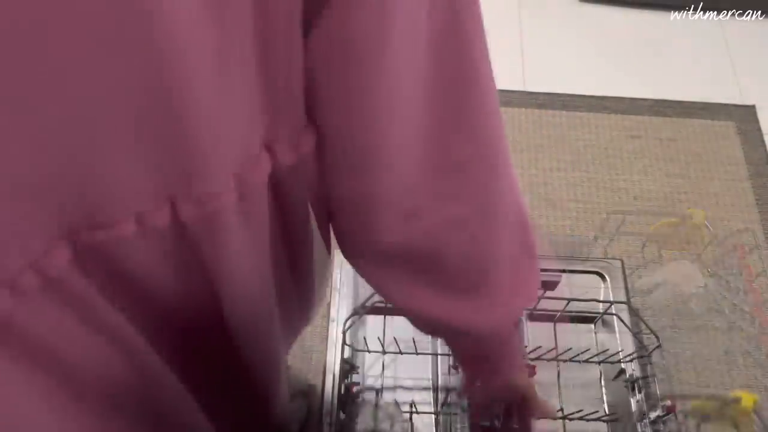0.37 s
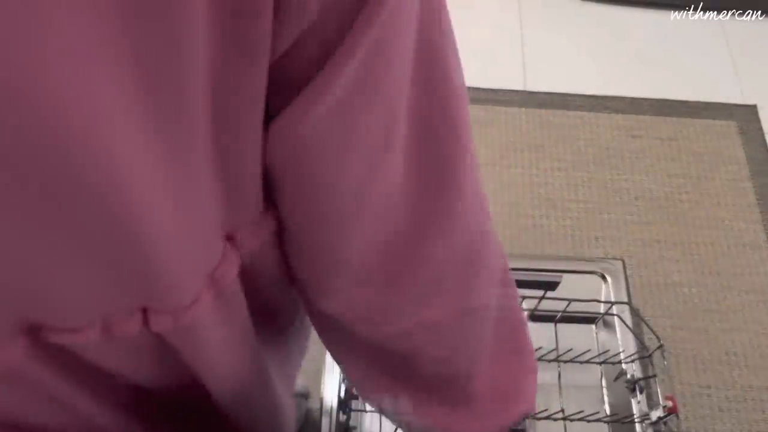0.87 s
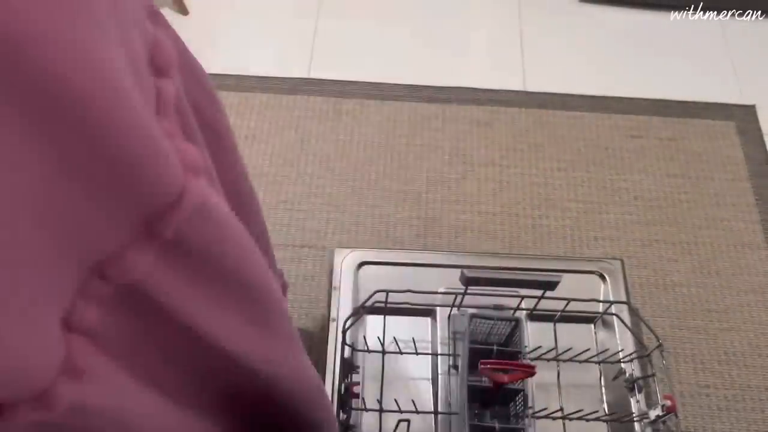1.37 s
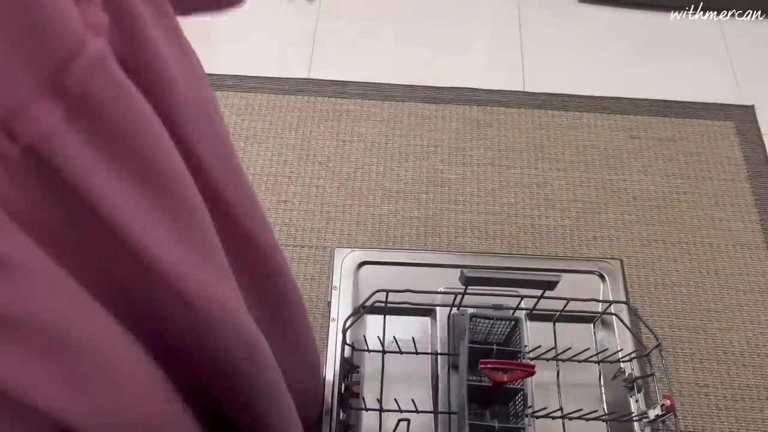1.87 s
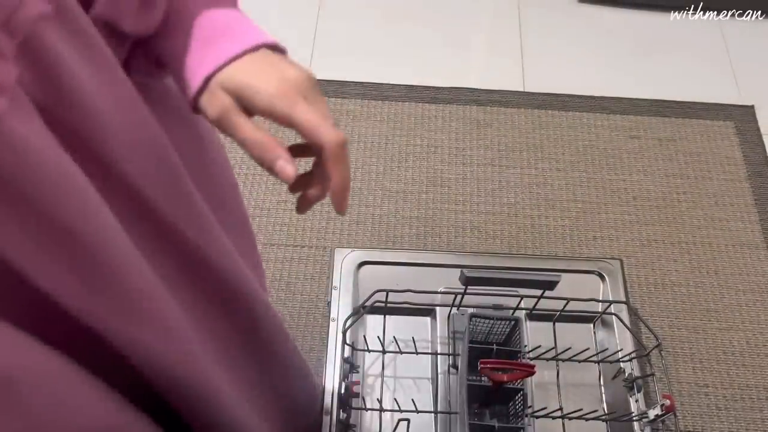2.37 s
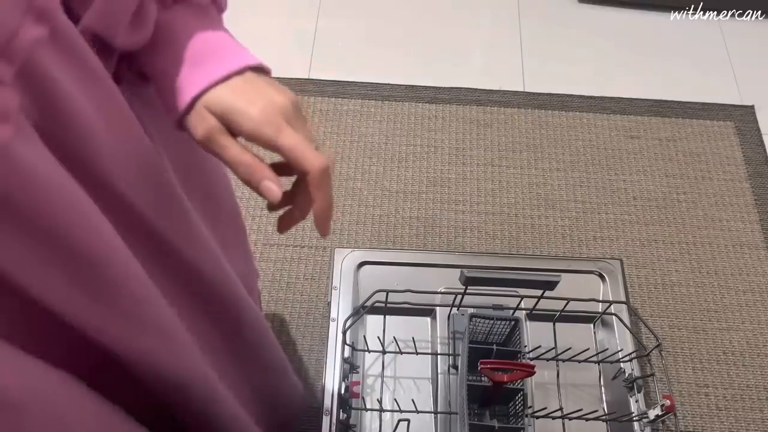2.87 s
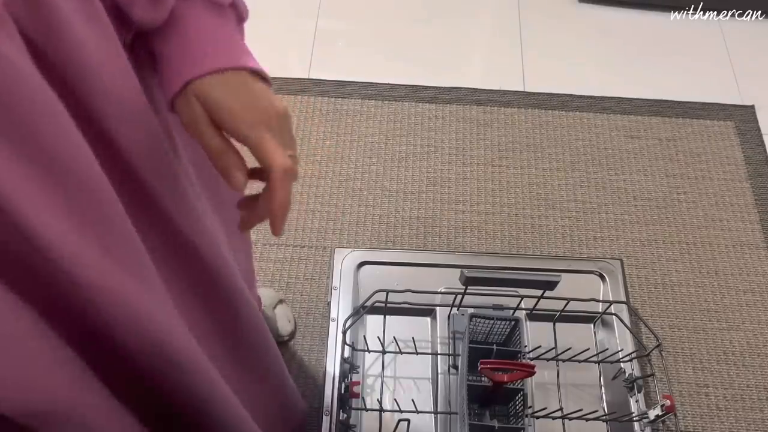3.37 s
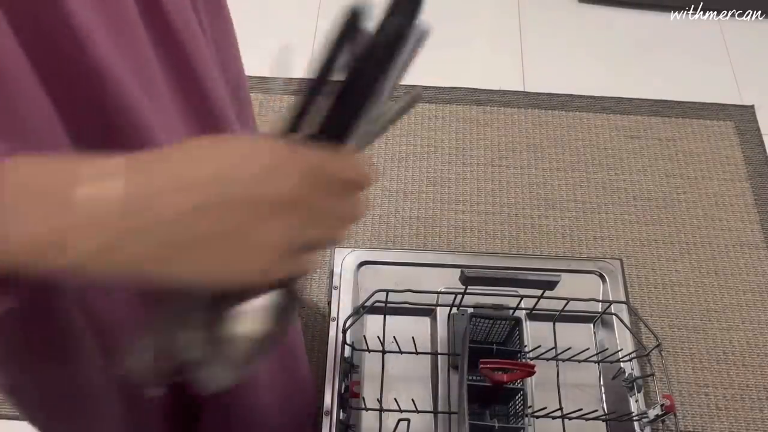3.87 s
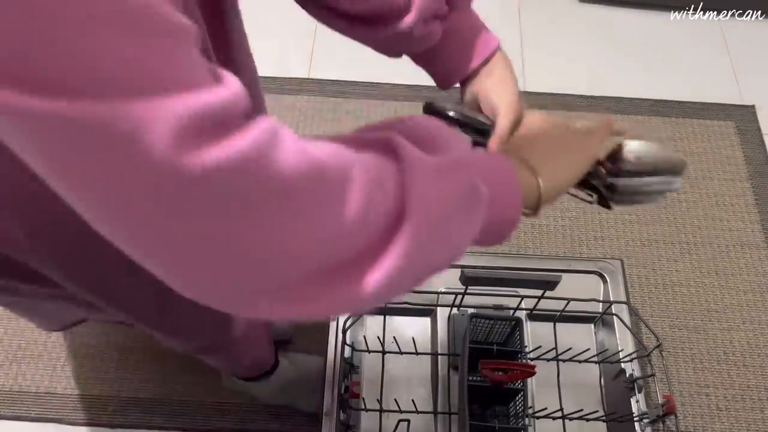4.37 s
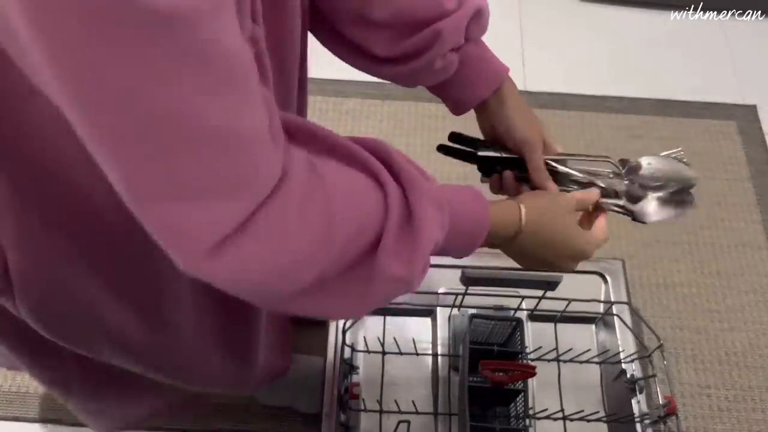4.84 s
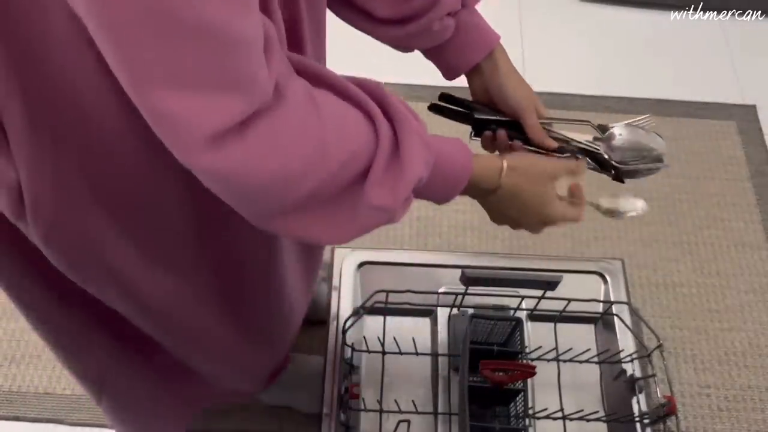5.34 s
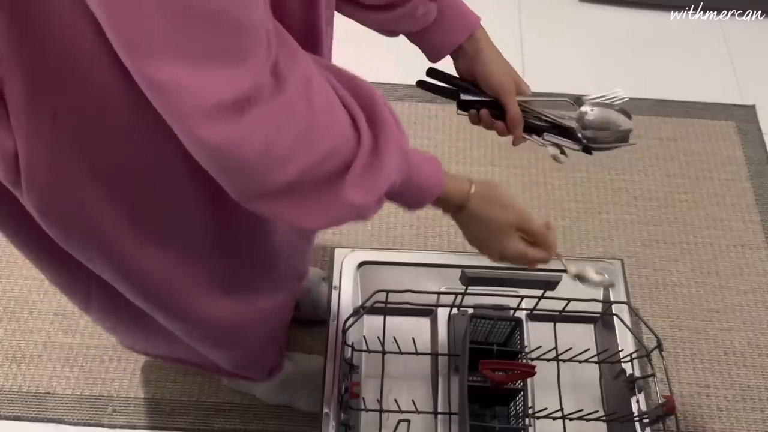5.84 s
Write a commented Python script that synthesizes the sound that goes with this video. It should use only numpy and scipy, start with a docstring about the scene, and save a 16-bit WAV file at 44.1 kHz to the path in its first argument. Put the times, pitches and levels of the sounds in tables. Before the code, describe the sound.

Close stereo pickup in a reverberant home kitchen with a quiet steady hum. First a rack rumbles and clatters with wavering squeaks, then near-quiet with soft footsteps. A dense, hard burst of forks and spoons scraping on ringing steel is the loudest moment. After a short lull, handled cutlery jingles brightly with dull grip rubs, tapering to small isolated ticks.

```python
"""A wire dishwasher rack rolls in with a squeal, and bumps shake its glasses, in a tiled kitchen.
Cutlery is raked together on a steel worktop to the left, then shuffled and sorted in the hands near the
microphones, the handles rubbing in the grip. Feet shuffle between, and an appliance hums low in the room.
Contacts are short bursts of coloured noise that set sines ringing; the squeal is two unsteady tones.
Feet and grip are noise alone, the hum is steady filtered noise, and the room adds dying echoes."""
import sys
import numpy as np
from scipy import signal
from scipy.fft import rfft, irfft, next_fast_len
from scipy.io import wavfile

SR = 44100
rng = np.random.default_rng(int(sys.argv[2]) if len(sys.argv) > 2 else 0)


def gain_from_decibels(decibels):
    """Convert decibel values to linear amplitude factors."""
    exponent = np.asarray(decibels, float) / 20
    return 10 ** exponent


def waveform_to_disk(signal):
    """Save audio, clipped to [-1, 1], as 16-bit WAV at the path in sys.argv[1]."""
    frames = np.transpose(np.atleast_2d(signal))
    scaled = np.clip(frames, -1, 1) * 32767
    samples = np.round(scaled).astype(np.int16)
    wavfile.write(sys.argv[1], SR, samples)


N = 263277  # length in samples

# Where rumble, body, middle and edge meet: three frequencies [Hz]
BAND_EDGES_HZ = (400, 2000, 7000)
# How each band of rack and feet noise follows a burst, one row each for rumble, body, middle, edge:
# (level above the top [dB], share of swell time [ratio], share of die-away [ratio], share of brightness [ratio])
RACK_BANDS = [(5.5, 1, 1.7, -.6), (2, 0.89, 1.63, -0.49), (0, 1.09, 1.31, -0.13), (-13, 0.51, 1.1, 1.3)]
# Tone colour of rack and feet: (frequency [Hz], relative level per hertz [dB])
RACK_COLOUR = [(24, -47), (40, -19.5), (86, 10), (135, -11), (412, -10), (597, -18), (845, -15.5),
               (1060, -17.5), (2060, -22.5), (2990, -16.5), (3650, -20), (8690, -34), (9840, -27.5),
               (13600, -38.5), (15000, -63.5)]
# Where rack and feet sit: (frequency [Hz], left minus right [dB])
RACK_SIDE = [(60, 1), (180, -2.5), (550, 1.5), (1650, 0.5), (4970, 7.5), (15000, -5.5)]
# Where the hands sit: (frequency [Hz], left minus right [dB])
HANDS_SIDE = [(60, -19), (180, 17.5), (550, -2), (1650, -0.5), (4970, 6), (15000, -4)]


def rms_one(x):
    """Scale to an average strength (rms) of one."""
    return x / np.sqrt(np.mean(x ** 2) + 1e-20)


def at_hz(points, hz):
    """Read a table at any frequency, in straight lines on a log-frequency axis."""
    table_hz, values = np.transpose(points)
    return np.interp(np.log(hz + 1), np.log(table_hz), values)


def colour(x, points, side):
    """Filter that never sounds ahead of its input (minimum phase), tipped left or right; two channels."""
    hz = np.fft.rfftfreq(4096, 1 / SR)
    db = at_hz(points, hz) + np.outer([.5, -.5], at_hz(side, hz))
    # folding the spectrum's logarithm onto positive times puts all the response after the input
    log_echoes = irfft(db * np.log(10) / 20)
    fold = np.r_[1, np.full(2047, 2), 1, np.zeros(2047)]
    kernel = irfft(np.exp(rfft(log_echoes * fold)))
    return signal.oaconvolve(np.broadcast_to(x, (2, N)), kernel, axes=1)[:, :N]


def bands(x):
    """Split sound by frequency into rumble, body, middle and edge."""
    low, middle, high = BAND_EDGES_HZ
    cuts = [(low, "low"), ([low, middle], "band"), ([middle, high], "band"), (high, "high")]
    return [signal.sosfilt(signal.butter(3, hz, kind, fs=SR, output="sos"), x) for hz, kind in cuts]


def band_of(hz):
    """Which of rumble, body, middle and edge holds this pitch."""
    return np.searchsorted(BAND_EDGES_HZ, hz)


def fading(x, time_s):
    """Turn each click into a jump that dies away exponentially."""
    return signal.lfilter([1], [1, -np.exp(-1 / (time_s * SR))], x)


def ring(clicks, hz, t60):
    """A resonance: a unit click sets a sine of height 1 ringing, which falls 60 dB in t60 seconds."""
    shrink = gain_from_decibels(-60 / (t60 * SR))
    turn = 2 * np.pi * hz / SR
    return signal.lfilter([0, np.sin(turn)], [1, -2 * shrink * np.cos(turn), shrink ** 2], clicks + 1e-18)


def bursts(start_s, swell_s, db, t60):
    """Loudness curve: each burst swells in a straight ramp, then dies away; their powers add."""
    power = np.zeros(N)
    for start, swell, top_db, die in np.broadcast(start_s, swell_s, db, t60):
        i = int(start * SR)
        t = np.arange(min(N - i, int((swell + 1.5 * die) * SR))) / SR
        ramp = np.minimum(t / swell, 1)
        decay = gain_from_decibels(top_db - 60 * np.maximum(t - swell, 0) / die)
        power[i:i + len(t)] += (ramp * decay) ** 2
    return np.sqrt(power)


def clatter(rows, follow, spectrum, side, modes, per_s, uneven_db, smear_s, ring_db, damped, apart):
    """Dense uneven contacts, each a short scrape, swell with the handling; each also strikes one mode, if any."""
    start_s, swell_s, top_db, t60, bright_db = np.transpose(rows)
    gains = [bursts(start_s, swell_s * late, top_db + db + share * bright_db, t60 * linger)
             for db, late, linger, share in follow]
    heights = gain_from_decibels(uneven_db * np.minimum(rng.exponential(1, N), 4))
    touches = (rng.random(N) < per_s / SR) * heights
    scrapes = fading(touches, smear_s)
    # several pieces at several places: the two ears share only part of the noise, most of it in the treble
    unshared = signal.sosfilt(signal.butter(2, 7000, fs=SR, output="sos"), rng.standard_normal(N))
    noise = rng.standard_normal(N) + apart * unshared * [[1], [-1]]
    parts = bands(colour(scrapes * noise, spectrum, side))
    out = sum(gain * rms_one(part) for gain, part in zip(gains, parts))
    dealt = rng.integers(0, max(len(modes), 1), N)  # which mode each touch strikes
    for k, (hz, db, mode_t60) in enumerate(modes):
        tip = gain_from_decibels(at_hz(side, hz) * np.array([[.5], [-.5]]))
        strikes = touches * (dealt == k) * gains[band_of(hz)]
        out += tip * gain_from_decibels(db + ring_db) * ring(strikes, hz, mode_t60 * damped)
    return out


def blows(rows, spectrum, side, modes, crack_s, crack_db, tick_db, knock_db, spread_db, focus_db,
          free_db, firm_edge_db, hardening):
    """A blow is a hard tick, a crack of dying noise and a knock; it rings mostly the modes near its pitch."""
    start_s, peak_db, body_db, ring_db, pitch_hz = np.transpose(rows)
    edge_db = firm_edge_db + hardening * (peak_db + 30)   # harder blows are brighter
    at = np.round(start_s * SR).astype(int)
    noise = rng.standard_normal(N)
    noise[at] = gain_from_decibels(tick_db)
    rumble, body, middle, edge = bands(colour(noise, spectrum, side))
    out = np.zeros((2, N))
    for band, db in zip((rumble + body, middle, edge), (body_db, 0, edge_db)):
        clicks = np.zeros(N)
        clicks[at] = gain_from_decibels(peak_db + db + crack_db)
        out += rms_one(band) * fading(clicks + 1e-18, crack_s)
    # the knock itself: one dull pulse that follows the body of the blow
    knocks = np.zeros(N)
    knocks[at] = gain_from_decibels(peak_db + body_db + knock_db)
    out += signal.sosfilt(signal.butter(2, [120, 1800], "band", fs=SR, output="sos"), knocks + 1e-18)
    mode_hz, mode_db, mode_t60 = np.transpose(modes)
    chance = rng.standard_normal((len(at), len(modes)))
    t = np.arange(int(.3 * SR))[:, None] / SR
    for i, level_db, loose_db, pitch, luck in zip(at, peak_db, ring_db, pitch_hz, chance):
        octaves_off = np.log2(mode_hz / pitch)
        # no two pieces are the same size: the nearest mode lands on the pitch, the others move along
        octaves_off -= octaves_off[np.argmin(np.abs(octaves_off))]
        hz = np.minimum(pitch * 2 ** octaves_off, SR / 2)
        own_db = (mode_db + spread_db * luck) * (octaves_off != 0)
        db = level_db + loose_db + own_db - focus_db * np.sqrt(np.abs(octaves_off))
        # a loosely held piece rings louder and, up to a limit, longer; a gripped one is damped
        t60 = mode_t60 * np.minimum(gain_from_decibels(loose_db - free_db), 1)
        rings = np.sin(2 * np.pi * hz * t) * gain_from_decibels(db - 60 * t / t60)
        tip = gain_from_decibels(np.outer(at_hz(side, hz), [.5, -.5]))
        out[:, i:i + len(t)] += (rings @ tip).T[:, :N - i]
    return out


def rolling_rack():
    """Jolts rattle the rack in many small contacts, and bumps along the rail set its glasses ringing."""
    # Bursts of rattling; swell and die-away are scaled for each band:
    # (start [s], swell [s], top level [dB], die-away t60 [s], brightness [dB])
    jolts = [(0.0, 0.001, -49.5, 0.26, -4), (.09, 0.014, -57.5, 0.95, -0.5), (.16, 0.11, -49.5, 1, -1),
             (.37, 0.024, -30, 0.27, 5), (.525, 0.029, -28.5, 0.25, 6), (.69, 0.045, -42.5, 0.55, -2),
             (.735, 0.044, -35, 0.45, -1.5), (.78, 0.042, -27, 0.11, 10), (.85, 0.046, -34, 0.34, 6.5)]
    # Bumps along the rail, and last a knock as the feet shuffle: (time [s], peak level [dB], body above peak
    # [dB], # ringing above peak [dB])
    bumps = [(.2194, -47, -3, 4), (.3714, -27.5, -9.5, -9), (.4668, -40, -26.5, -26),
             (.5308, -22, 9, -26.5), (.5994, -27, -7, -6), (.7509, -35, -16, -12),
             (.7674, -21.5, -5.5, -4.5), (.8294, -23.5, 5, -18.5), (.8994, -27, 2, -9.5),
             (1.6077, -41, -8, -37)]
    # What rings in the rack with its glasses: (pitch [Hz], relative level [dB], longest t60 [s])
    glasses = [(100.6, -2, 0.44), (305, -6, 0.075), (477.4, -3, 0.062), (854, -9, 0.15), (4260, -16, .1),
               (5100, -7, 0.033), (6930, -20, .07), (9560, -5, 0.16), (9670, -13, 0.11),
               (10200, -11.5, .12), (10880, -15.5, 0.052), (12350, -12, .08)]
    rattle = clatter(jolts, RACK_BANDS, RACK_COLOUR, RACK_SIDE, glasses, per_s=1500, uneven_db=5,
                     smear_s=0.0076, ring_db=-10, damped=0.58, apart=0.94)
    pitched_bumps = [(*row, 842) for row in bumps]  # every bump rings most at 842 Hz
    knocks = blows(pitched_bumps, RACK_COLOUR, RACK_SIDE, glasses, crack_s=.01, crack_db=-20, tick_db=0,
                   knock_db=12, spread_db=3, focus_db=2, free_db=-11, firm_edge_db=-15.5, hardening=.3)
    return rattle + knocks


def wheel_squeal():
    """A wheel sticks and slips on its rail: two unsteady tones, the lower sagging as the rack slows."""
    # Squeals after each push; the upper tone dies away sooner:
    # (start [s], swell [s], lower tone level [dB], upper tone level [dB], lower tone's die-away t60 [s])
    squeaks = [(.38, 0.043, -37.5, -49.5, 0.26), (0.516, 0.028, -31, -46.5, 0.49),
               (.62, .026, -49, -72, 0.46), (.69, 0.15, -34.5, -44.5, 0.45), (.91, 0.014, -43, -39, 0.31),
               (.98, .03, -51.5, -58.5, 0.68)]
    start_s, swell_s, low_db, high_db, t60 = np.transpose(squeaks)
    rough_db, waver_hz = 4, 24   # unsteadiness of loudness and of pitch
    stops_s, stopping_s = 1.105, .025
    t = np.arange(N) / SR
    pitch_hz = np.array([3020 - 115 * t, np.full(N, 6030)])   # about an octave apart
    gains = np.array([bursts(start_s, swell_s, low_db, t60), bursts(start_s, swell_s, high_db, t60 * .45)])
    flutter = signal.sosfilt(signal.butter(2, 70, fs=SR, output="sos"), rng.standard_normal((2, 2, N)))
    waver, rough = flutter / flutter.std()
    phase = 2 * np.pi * np.cumsum(pitch_hz + waver_hz * waver, axis=1) / SR
    tones = np.sum(gains * gain_from_decibels(rough_db * rough) * np.sin(phase), axis=0)
    tones *= np.clip((stops_s - t) / stopping_s, 0, 1)
    return np.sqrt(2) * tones * gain_from_decibels([[2], [-2]])   # louder on the left


def raking_on_worktop():
    """Cutlery raked on steel: dense scraping contacts and single hard blows make the worktop ring."""
    # Bursts of raking; swell and die-away are scaled for each band:
    # (start [s], swell [s], top level [dB], die-away t60 [s], brightness [dB])
    rakes = [(2.408, 0.035, -40, .3, -2.5), (2.448, 0.0041, -18.5, 0.68, 0.5),
             (2.538, 0.023, -18, 0.47, 2.5), (2.616, 0.012, -22.5, 1, 1), (2.635, 0.064, -13, 0.41, 1.5),
             (2.76, 0.028, -20.5, 0.098, 2.5), (2.92, 0.017, -42.5, .1, -2.5),
             (2.947, 0.0032, -31, 0.18, 12.5), (2.956, 0.015, -16, 0.16, 12.5),
             (3.144, 0.0017, -45.5, 0.1674, 8.5), (3.29, 0.042, -58, 0.5, 1), (3.352, 0.022, -55, 0.64, 1),
             (3.45, 0.0071, -55, 0.43, 5), (3.482, 0.0044, -46.5, 0.098, 20), (3.53, 0.039, -64, .45, -5),
             (3.66, 0.059, -65, 0.32, -4.5)]
    # Single blows: (time [s], peak level [dB], body above peak [dB], ringing above peak [dB],
    # pitch that rings most [Hz])
    hits = [(2.2856, -46.5, -22, -7.5, 3600), (2.4102, -40.5, -8, -5.5, 970), (2.4258, -22, -9, -21, 1640),
            (2.4538, -6.5, -11, -11, 3535), (2.5441, -9.5, -2, -14.5, 1270),
            (2.6196, -14, 10.5, -13.5, 990), (2.6773, -5.5, -13.5, -8.5, 1026),
            (2.9499, -10.5, -27, -38, 4440), (2.9611, -10.5, -39, -11, 2180),
            (3.1477, -22, -31, -18.5, 4444), (3.3156, -41.5, -7.5, -20.5, 3740),
            (3.3554, -30, -24, -20.5, 3740), (3.4194, -50, -11.5, -8, 3780), (3.455, -39, -7, -11, 4200),
            (3.485, -30.5, -19.5, -19, 3690), (3.6849, -46, -1.5, -16, 964)]
    # What rings in the worktop: (pitch [Hz], relative level [dB], longest t60 [s])
    worktop = [(830, 0.5, 0.037), (870, -17.5, 0.15), (1135, -4.5, 0.28), (1230, -17.5, 0.12),
               (1260, 4, 0.13), (1279, -3.5, 0.2), (2180, -9, 0.13), (2724, -19.5, 0.05),
               (3360, -0.5, 0.033), (3280, -7.5, 0.065), (3510, -3.5, 0.043), (3840, -6, 0.18),
               (4550, -0.5, .07), (4270, -3, 0.05), (4380, -7, 0.073), (5300, -14, .08),
               (5510, -11.5, 0.15), (9230, -13, 0.092), (8910, -1.5, .1), (10500, -0.5, 0.059),
               (11300, -25.5, .1)]
    # How rumble, body, middle and edge follow a burst: (level above the top [dB],
    # share of swell time [ratio], share of die-away [ratio], share of brightness [ratio])
    follow = [(-10, 0.92, 1.3, -2.4), (-2.5, 0.87, 0.88, -1.6), (1, 0.69, 0.78, -0.015),
              (-4, 0.68, 0.74, 0.53)]
    # Tone colour of the contacts: (frequency [Hz], relative level per hertz [dB])
    spectrum = [(30, -42.5), (72, -14), (104, 4), (146, -24), (390, -12.5), (650, -8.5), (900, 7.5),
                (1280, -1.5), (1550, -5), (2700, -11), (3350, -7), (3850, -11), (4450, -4.5), (5100, -11),
                (7700, -21.5), (11500, -14), (14300, -25), (15300, -55.5)]
    # Where the worktop sits: (frequency [Hz], left minus right [dB])
    side = [(60, -6), (180, 4.5), (550, 5.5), (1650, -1), (4970, 9.5), (15000, -4.5)]
    scraping = clatter(rakes, follow, spectrum, side, worktop, per_s=1000, uneven_db=2.5,
                       smear_s=0.0077, ring_db=-5.5, damped=0.53, apart=0.8)
    struck = blows(hits, spectrum, side, worktop, crack_s=0.018, crack_db=-19.5, tick_db=17, knock_db=4.5,
                   spread_db=1, focus_db=21, free_db=-11, firm_edge_db=-16, hardening=0.19)
    return scraping + struck


def sorting_in_hands():
    """Cutlery shuffled in the hands: many small contacts, with single clinks that ring at their own pitch."""
    # Bursts of shuffling; swell and die-away are scaled for each band:
    # (start [s], swell [s], top level [dB], die-away t60 [s], brightness [dB])
    shuffles = [(3.91, 0.027, -59.5, 1.13, -4.5), (4.003, 0.0049, -43, 0.24, 3),
                (4.103, .004, -56, 0.28, 3.5), (4.131, 0.005, -49, .3, 0.5), (4.17, 0.021, -40, 1.1, 2),
                (4.26, 0.019, -36.5, 0.95, 3.5), (4.334, 0.0054, -29.5, 0.5, 3.5),
                (4.395, 0.02, -34, 0.6, 2), (4.495, .004, -33, .3, 1.5), (4.506, .008, -32, 0.33, 3),
                (4.73, .024, -39.5, .3, -4), (4.812, .005, -49.5, 0.17, 3),
                (4.864, 0.0034, -44, 0.74, -1.5), (4.9, 0.0047, -34.5, 0.14, 4.5),
                (4.93, 0.01, -46, .4, 5.5), (5.163, .005, -52.5, 0.43, -2), (5.238, .006, -52.5, .3, -0.5),
                (5.282, 0.0051, -45, 0.53, -8), (5.34, 0.016, -64, .3, 0),
                (5.406, 0.0034, -56.5, 0.56, 1.5), (5.462, 0.0037, -56, .3, 6.5),
                (5.48, 0.027, -44.5, 0.5, -5.5), (5.576, 0.0064, -59, 0.59, 3.5),
                (5.657, 0.0013, -40.5, 0.12, -9.5), (5.665, 0.0202, -47, 0.29, -3.5)]
    # Single clinks: (time [s], peak level [dB], ringing above peak [dB], pitch that rings most [Hz])
    clinks = [(4.0106, -29.5, -6, 10240), (4.1053, -37, -13, 5250), (4.1334, -31.5, -11, 3540),
              (4.1734, -43, -6.5, 4290), (4.1819, -38.5, -4, 5140), (4.2704, -25.5, -8.5, 11160),
              (4.2837, -27.5, -18.5, 3930), (4.3009, -19.5, -9.5, 10500), (4.3385, -12, -8.5, 10900),
              (4.3514, -22, -2.5, 4940), (4.4144, -25.5, -1.5, 12750), (4.4974, -25.5, -12, 6660),
              (4.5116, -18, -11, 10840), (4.5342, -22.5, -9, 10690), (4.555, -34, 0, 5270),
              (4.7338, -37, -7.5, 4016), (4.7426, -34, -7.5, 3750), (4.807, -34.5, -3.5, 11900),
              (4.817, -31, -3, 13400), (4.8668, -31.5, -7.5, 2950), (4.9043, -24, -8, 10740),
              (4.9446, -22.5, 2.5, 11000), (4.952, -37, 0, 4910), (5.1682, -38, -6, 3230),
              (5.175, -52.5, 3.5, 2740), (5.24, -46.5, -10, 10560), (5.2855, -37, -8.5, 10800),
              (5.4087, -39, -11, 11300), (5.465, -34, -11.5, 11670), (5.5144, -36.5, -4.5, 4460),
              (5.5788, -34, -9.5, 10200), (5.659, -37, -7.5, 10100), (5.6834, -47.5, 4, 2536)]
    # What rings in the cutlery: (pitch [Hz], relative level [dB], longest t60 [s])
    cutlery = [(1113, 6, 0.062), (2020, -21, 0.064), (2640, -2, 0.07), (2810, -10.5, 0.073),
               (2880, 1.5, 0.077), (3220, -5, 0.11), (3348, -4, 0.13), (3737, 0.5, 0.14),
               (4100, 0.5, 0.057), (4710, -18, 0.074), (5020, -4.5, 0.17), (5400, -20.5, 0.097),
               (6000, -32.5, 0.023), (6730, 3, 0.075), (7240, 0.5, 0.052), (8400, -21.5, 0.05),
               (8720, -7, 0.089), (9840, -1.5, 0.13), (10700, -6, 0.049), (10944, 6.5, 0.14),
               (11000, -9.5, 0.122), (12300, -4, 0.14), (12300, -9, 0.112), (13700, -3, 0.11),
               (13400, -14, 0.075), (14820, -13, 0.13)]
    # How rumble, body, middle and edge follow a burst: (level above the top [dB],
    # share of swell time [ratio], share of die-away [ratio], share of brightness [ratio])
    follow = [(-29.5, 0.98, 0.81, 0), (-16, 0.68, 0.91, 0.41), (0, 0.83, 0.86, 0.64), (-1, 0.96, 0.62, 1.5)]
    # Tone colour of the contacts: (frequency [Hz], relative level per hertz [dB])
    spectrum = [(24, -68), (40, -27), (91, -16), (115, -15), (130, -35.5), (180, -7), (209, -32),
                (256, -37.5), (896, -17.5), (2150, -12), (5050, -5), (8130, -10.5), (10400, -2.5),
                (13400, -7.5), (16000, -35)]
    shuffling = clatter(shuffles, follow, spectrum, HANDS_SIDE, cutlery, per_s=1200, uneven_db=3,
                        smear_s=0.008, ring_db=-6, damped=.35, apart=.6)
    thin_clinks = np.insert(clinks, 2, -39, axis=1)   # every clink has its body 39 dB below its peak
    clinking = blows(thin_clinks, spectrum, HANDS_SIDE, cutlery, crack_s=.005, crack_db=-15, tick_db=14,
                     knock_db=15.5, spread_db=3.5, focus_db=24, free_db=3.5, firm_edge_db=-4, hardening=.05)
    return shuffling + clinking


def handles_in_grip():
    """Handles rub and thump in the grip: dull scraping contacts that strike nothing that rings."""
    # Bursts of rubbing; swell and die-away are scaled for each band:
    # (start [s], swell [s], top level [dB], die-away t60 [s], brightness, unused here [dB])
    grips = [(4.3, .04, -52.5, 0.28, 2), (4.495, .006, -50, .25, 0), (4.782, 0.014, -42.5, .3, 0),
             (4.94, .003, -40, 0.051, 0)]
    # How rumble, body, middle and edge follow a burst: (level above the top [dB],
    # share of swell time [ratio], share of die-away [ratio], share of brightness [ratio])
    follow = [(-5, 1.26, 0.7, 0), (-2.5, 0.9, 0.74, 0), (-14.5, 0.93, 0.58, 0), (-40, 1, 1, 0)]
    # Tone colour of the rubbing: (frequency [Hz], relative level per hertz [dB])
    spectrum = [(60, -35), (200, -5), (700, -3), (1900, -6), (2400, -17.5), (8000, -40)]
    return clatter(grips, follow, spectrum, HANDS_SIDE, [], per_s=2500, uneven_db=3,
                   smear_s=.006, ring_db=0, damped=1, apart=1)


def shuffling_feet():
    """Feet shuffle on the floor: soft scraping contacts without any ringing."""
    # Bursts of shuffling; swell and die-away are scaled for each band:
    # (start [s], swell [s], top level [dB], die-away t60 [s], brightness [dB])
    feet = [(1.22, .06, -67, .15, 1.5), (1.36, .05, -73, .2, -8), (1.604, .03, -60, .7, -10),
            (1.77, .025, -70, .2, -25)]
    return clatter(feet, RACK_BANDS, RACK_COLOUR, RACK_SIDE, [], per_s=2500, uneven_db=3,
                   smear_s=.008, ring_db=0, damped=1, apart=1)


def kitchen(x):
    """Diffuse echoes off the room, other ones in each ear, dying faster in the treble."""
    # How long echoes last, one row each for rumble, body, middle, edge: (frequency [Hz], t60 [s])
    room = [(100, 0.44), (1000, 0.32), (5000, 0.31), (14000, 0.17)]
    t = np.arange(int(.7 * SR)) / SR
    parts = bands(rng.standard_normal((2, len(t))))
    tail = sum(part * gain_from_decibels(-60 * t / t60) for part, (hz, t60) in zip(parts, room))
    tail *= 1 - np.exp(-t / 0.0058)   # the echoes take a few milliseconds to build up
    tail /= np.sqrt(np.sum(tail ** 2) / 2)
    return signal.fftconvolve(x, tail, axes=1)[:, :N]


def hum():
    """Low appliance hum and room air: steady filtered noise, with a set likeness between the ears."""
    # Tone colour of the hum: (frequency [Hz], relative level per hertz [dB])
    spectrum = [(15, -52.5), (25, -22), (80, 4.5), (108, 6), (145, -11), (270, -3), (335, -11.5),
                (641, -19.5), (1130, -40), (1330, -34.5), (2350, -39.5), (5000, -38.5), (8140, -55),
                (12500, -44), (16000, -77)]
    # How alike the ears are, below 0 counting as 0: (frequency [Hz], left-right likeness [ratio])
    likeness = [(60, -3.7), (180, 0.39), (550, -0.17), (1650, -0.33), (4970, -0.33), (15000, 0.95)]
    hz = np.fft.rfftfreq(N, 1 / SR)
    alike = np.clip(at_hz(likeness, hz), 0, 1)
    mid, side = rfft(rng.standard_normal((2, N))) * gain_from_decibels(at_hz(spectrum, hz))
    pair = np.sqrt(1 + alike) * mid + np.sqrt(1 - alike) * side * [[1], [-1]]
    return gain_from_decibels(-50) * rms_one(irfft(pair, N))


def scene():
    """Rack, worktop and hands, each with its share of the room, over the hum."""
    rack = rolling_rack() + wheel_squeal() + shuffling_feet()
    worktop = raking_on_worktop()
    hands = sorting_in_hands() + handles_in_grip()
    echoes = kitchen(gain_from_decibels(-7.5) * rack + gain_from_decibels(-8.5) * worktop + gain_from_decibels(-5.5) * hands)
    return rack + worktop + hands + echoes + hum()


def top_cut(x):
    """Nothing passes above the cut-off."""
    return signal.sosfilt(signal.butter(12, 16950, fs=SR, output="sos"), x)


def record(dry):
    """Two close microphones: sound reaches the left a little late, and both hear nearly the same bass."""
    left_lag_s, side_cut_hz, bass_cut_hz = 1.3e-5, 220, 42
    size = next_fast_len(N + 4096)
    hz = np.fft.rfftfreq(size, 1 / SR)
    left, right = rfft(dry, size)
    left = left * np.exp(-2j * np.pi * hz * left_lag_s)
    mid = (left + right) / 2
    side = (left - right) / 2 * (1j * hz / (side_cut_hz + 1j * hz)) ** 2
    pair = irfft([mid + side, mid - side], size)[:, :N]
    pair = signal.sosfilt(signal.butter(2, bass_cut_hz, "high", fs=SR, output="sos"), pair)
    mix = 0.82 * np.tanh(pair / 0.99)   # the loudest peaks are rounded off
    return top_cut(mix)


dry = scene()
out = record(dry)
waveform_to_disk(out)
```